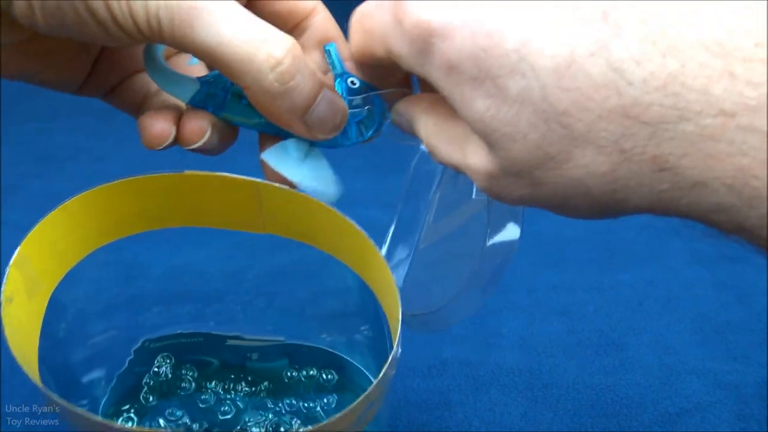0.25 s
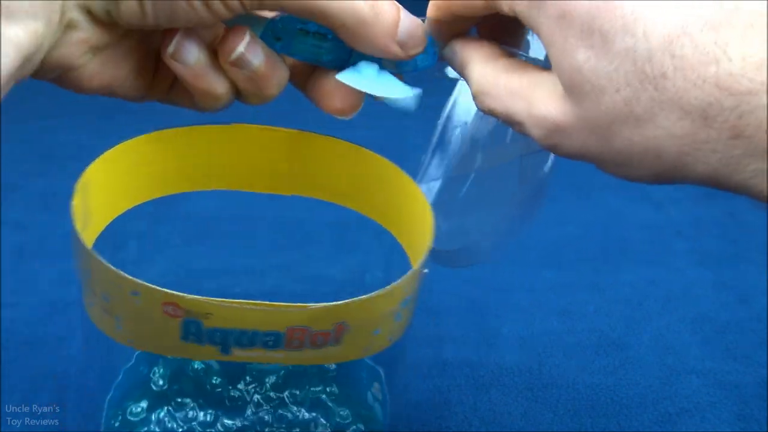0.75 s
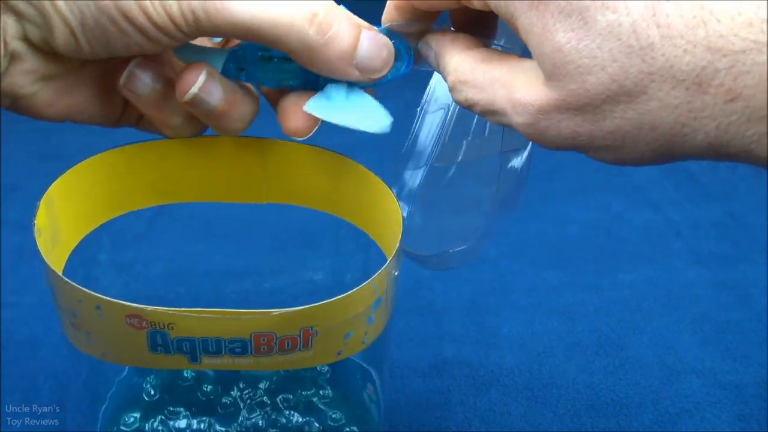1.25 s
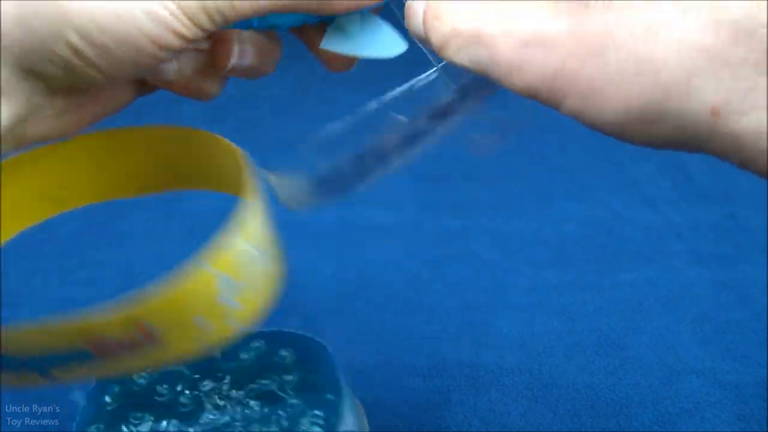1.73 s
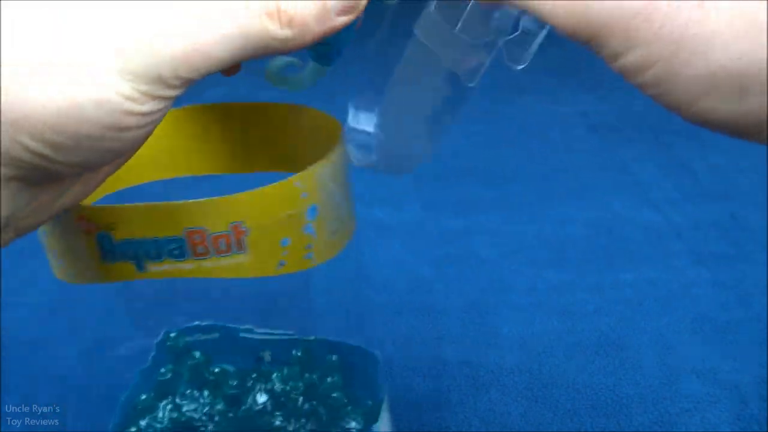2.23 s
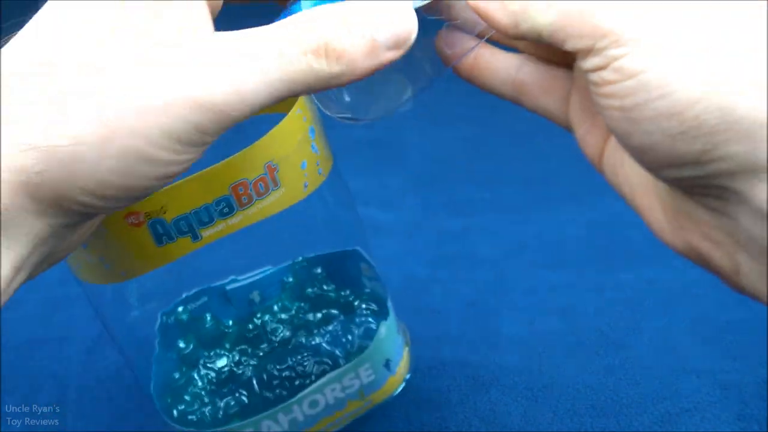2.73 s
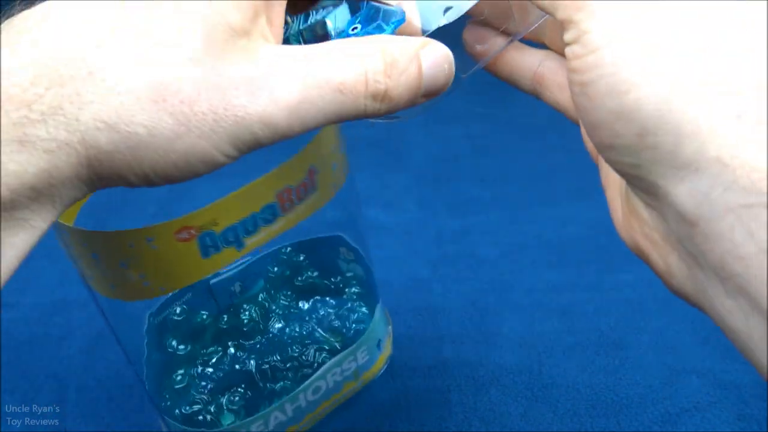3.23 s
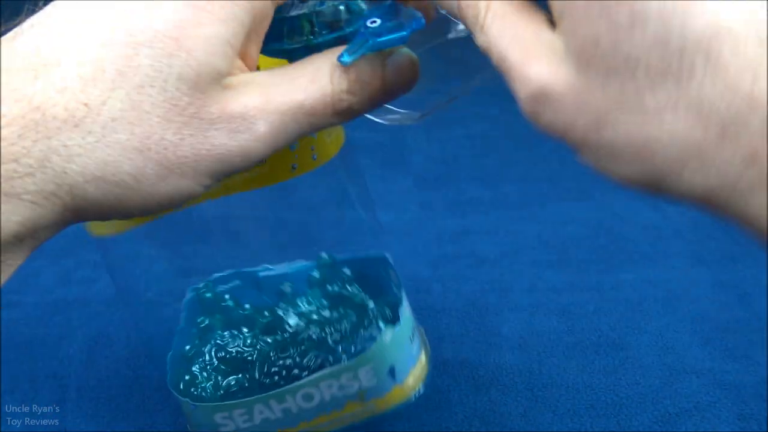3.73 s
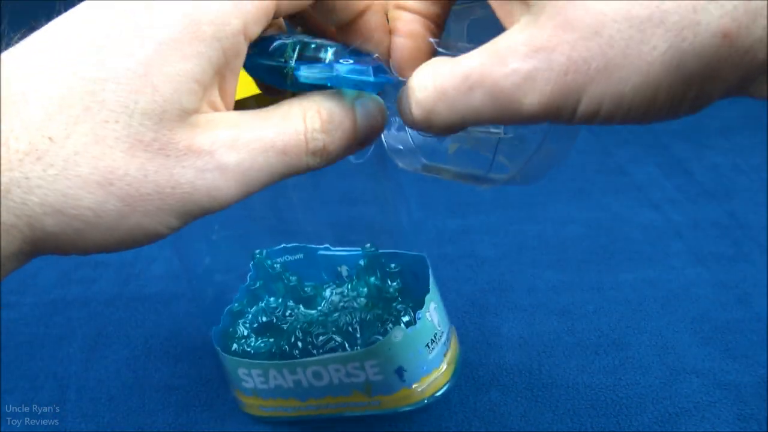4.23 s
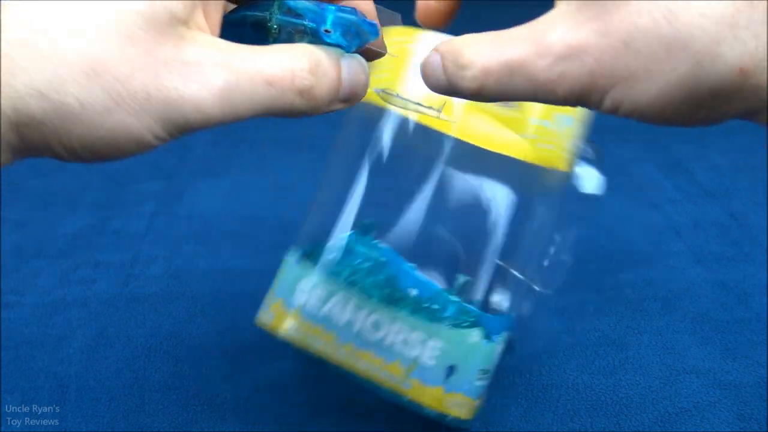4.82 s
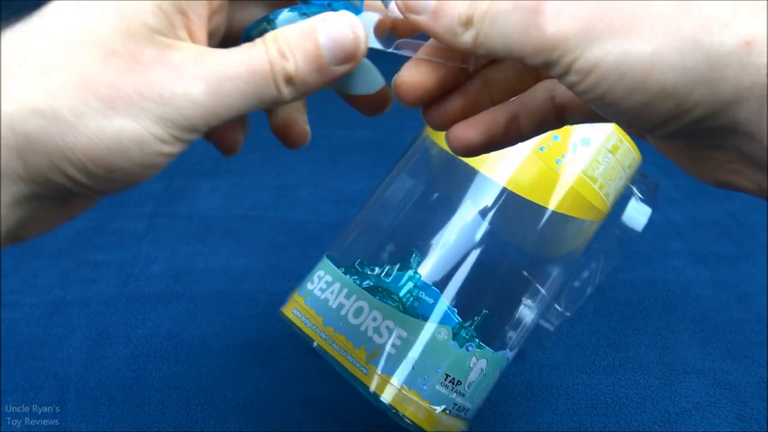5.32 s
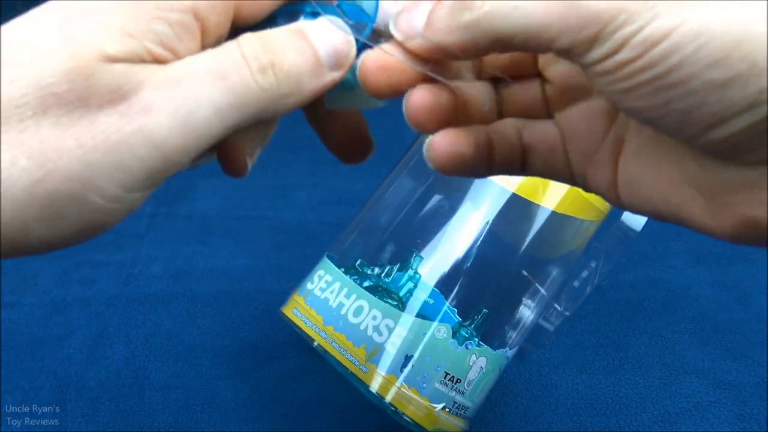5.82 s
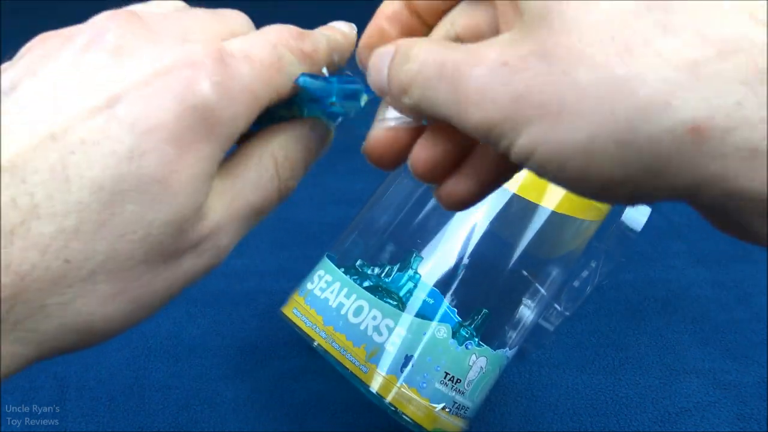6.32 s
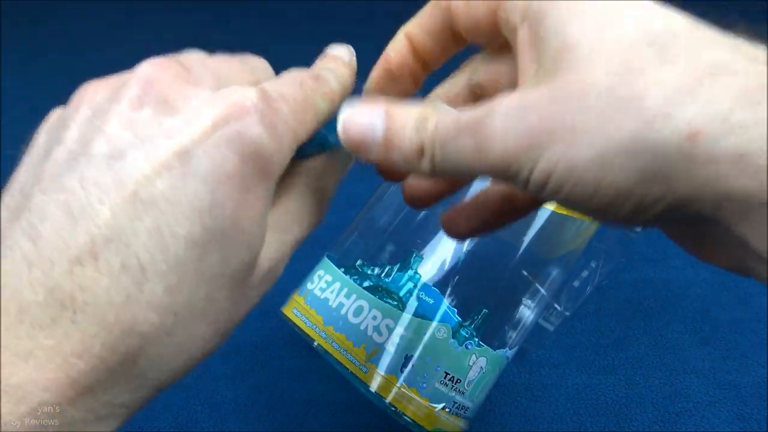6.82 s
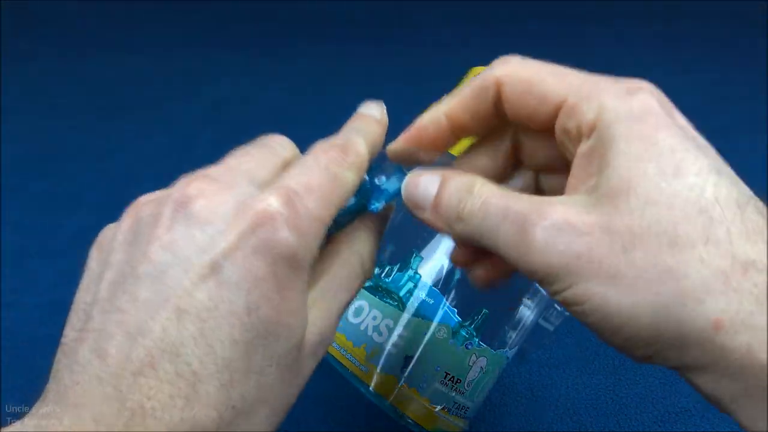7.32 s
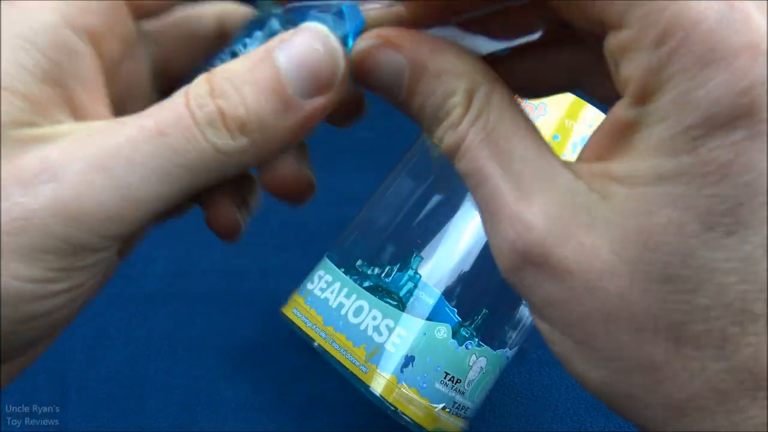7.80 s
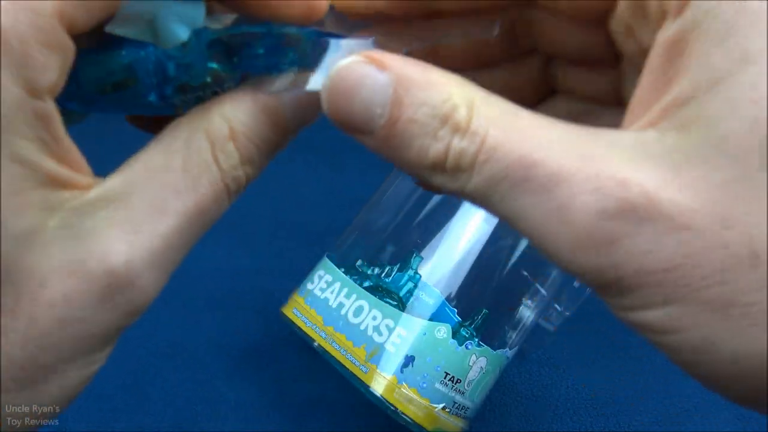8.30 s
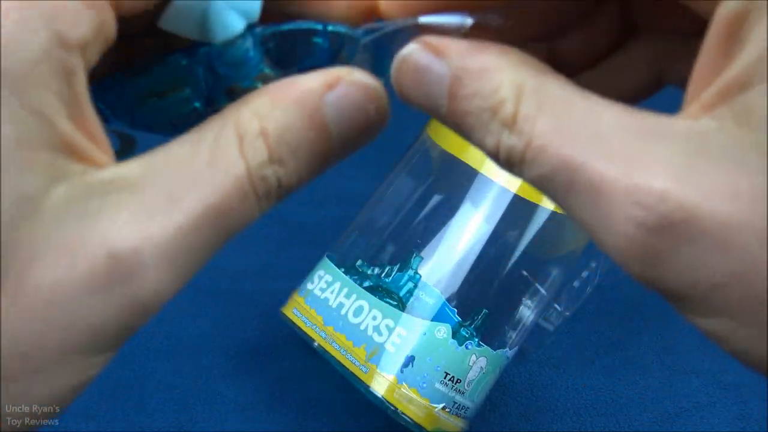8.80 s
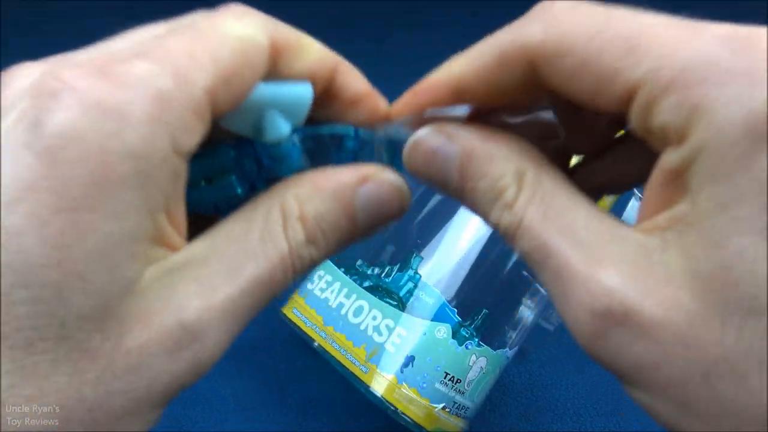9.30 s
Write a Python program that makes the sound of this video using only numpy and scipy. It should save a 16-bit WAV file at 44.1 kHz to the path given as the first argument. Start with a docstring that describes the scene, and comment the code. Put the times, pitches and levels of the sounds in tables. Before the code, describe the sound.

Close, sharp plastic snaps and rustling over a quick mechanical ticking and hollow tub bumps, a brief tear, then sparse clicks in a quiet room.

```python
"""A quiet furnished room, where hands free a small swimming toy from stiff clear packaging close by.
At first the toy's tail ticks against its stops. The sheet snaps, rustles and tears, and fingers bump the tub.
Later mostly nail taps, light strokes and scattered clicks are left over the hum of the room.
Short noise bursts ring the toy, sheet and tub; random grains make the rubbing, strokes and tear;
filtered noise makes the hum, and scattered echoes make the room."""
import sys
import numpy as np
from scipy import signal
from scipy.fft import rfft, irfft, next_fast_len
from scipy.io import wavfile
from scipy.ndimage import uniform_filter1d

SR = 44100
rng = np.random.default_rng(int(sys.argv[2]) if len(sys.argv) > 2 else 0)


def dump(signal):
    """Clip the signal to [-1, 1] and save it as 16-bit WAV at the path in sys.argv[1]."""
    limited = np.clip(np.atleast_2d(signal).T, -1, 1)
    pcm = np.round(limited * 32767).astype(np.int16)
    wavfile.write(sys.argv[1], SR, pcm)


N = 421145


def gain_of(db):
    """Turns decibels into a factor."""
    return 10 ** (np.asarray(db) / 20)


def evened(x):
    """Scales a sound to an average (rms) level of 1."""
    return x / np.sqrt(np.mean(x ** 2) + 1e-20)


def read(points, hz):
    """Reads a table of (pitch, value) between its points, on a logarithmic pitch axis."""
    f, value = np.transpose(points)
    return np.interp(np.log(hz + 1), np.log(f + 1), value)


def coloured(x, points):
    """Filters a sound by a table of (pitch_hz, level_db)."""
    size = next_fast_len(x.shape[-1])
    hz = np.fft.rfftfreq(size, 1 / SR)
    spectrum = rfft(x, size) * gain_of(read(points, hz))
    return irfft(spectrum, size)[..., :x.shape[-1]]


def peak(hz, centre_hz, width_hz):
    """Response of one resonance that rings after a blow, with gain 1 at its centre."""
    return 1j * hz * width_hz / (centre_hz ** 2 - hz ** 2 + 1j * hz * width_hz)


def placed(times, peak_db, sounds):
    """Lays short sounds on a silent track at their peak levels."""
    track = np.zeros(N + sounds.shape[1])
    for s, db, sound in zip(times, peak_db, sounds):
        track[round(s * SR):][:len(sound)] += gain_of(db) * sound / abs(sound).max()
    return track[:N]


def add(track, s, sound):
    """Adds a sound to a track from time s."""
    part = track[round(s * SR):][:len(sound)]
    part += sound[:len(part)]


def bursts(count, rise_s, t60, size=2048, lead_s=0):
    """Spectra of noise bursts, the force of a blow: a faint creak during the lead, a crack, a weaker rattle."""
    since = np.arange(size) / SR - lead_s
    t = np.maximum(since, 0)
    creak = (since < 0) * gain_of(-22 + 4000 * since)
    crack = gain_of(-60 * t / t60)
    rattle = .22 * gain_of(-22 * t / t60)
    force = creak + (1 - np.exp(-t / rise_s)) * (crack + rattle)
    return rfft(rng.standard_normal((count, size)) * force)


def grains(per_s, spread_db):
    """Random clicks of uneven size, most of them small, scaled to an average level of 1."""
    size = gain_of(spread_db * np.minimum(rng.exponential(1, N), 5)) * rng.standard_normal(N)
    return evened(size * (rng.random(N) < per_s / SR))


# tone of the room hum, before its overall level is set: pitch_hz, level_db (per Hz)
HUM_TONE = [(12, -47.5), (25, -5), (58, -9), (108, 3), (174, -10), (450, -19.5), (800, -18.5), (945, -8.5),
            (1030, -14), (1110, -9), (1300, -20), (6000, -27), (13000, -28.5), (16000, -41)]
HUM_DB = -64  # average level in the middle


def room_hum():
    """Steady noise, coloured like the hum of the room: one track for the middle, one for the side."""
    hum = coloured(rng.standard_normal((2, N)), HUM_TONE)
    return hum * gain_of(HUM_DB) / np.std(hum[0])


# how long echoes take to fade by 60 dB: pitch_hz, fade_s
ECHO_FADE = [(300, 0.33), (1300, 0.22), (3500, 0.24), (9000, 0.19), (15000, 0.078)]


def room(x):
    """Little comes back at first, the walls answer after a gap, then a tail dies band by band."""
    # six echo patterns, each with one impulse of random sign in every 20 samples
    taps = np.zeros((6, SR // 2))
    at = np.arange(120, SR // 2 - 20, 20) + rng.integers(0, 20, (6, (SR // 2 - 121) // 20))
    np.put_along_axis(taps, at, rng.choice([-1., 1.], at.shape), 1)
    hz, t, bands = signal.stft(taps, SR, nperseg=128)
    arrival = np.where(t < .011, .6, 1 + .8 * np.exp(-((t - .015) / 0.0059) ** 2))
    fade = gain_of(-60 * t / read(ECHO_FADE, hz)[:, None])
    echo = signal.istft(bands * arrival * fade, SR, nperseg=128)[1]
    # the hands move, so the echo pattern drifts among three sets of paths, 0.7 rounds per second
    rounds = .7 * np.arange(N) / SR + np.arange(3)[:, None] / 3
    turn = np.cos(2 * np.pi * rounds) * np.sqrt(2 / 3)
    wet = signal.fftconvolve(np.tile(x * turn, (2, 1)), echo / np.linalg.norm(echo[0]), axes=1)[:, :N]
    return wet.reshape(2, 3, N).sum(1)


# the hands work the packaging, levels glide between rows: time_s, sheet_hiss_db, tub_rubbing_db
HANDLING_LEVELS = [(0.0, -40.5, -54.5), (0.08, -60.5, -63), (1.44, -60, -67), (1.67, -66.5, -56),
                   (2.05, -55, -59.5), (2.31, -63.5, -56), (2.44, -50, -51), (2.6, -54.5, -62),
                   (3.0, -54, -52.5), (3.11, -56, -56), (3.33, -57.5, -68), (3.54, -52, -49.5),
                   (3.85, -58.5, -64.5), (4.57, -67.5, -68.5), (4.76, -57.5, -63), (5.16, -72.5, -64),
                   (5.64, -61, -73.5), (6.38, -76, -76), (9.55, -73.5, -77.5)]
# a bent piece of sheet relaxes in a flurry of tiny ticks: start_s, length_s, level_db
TICK_FLURRIES = [(1.946, 0.12, -54), (5.375, 0.23, -55), (5.897, 0.44, -64.5), (7.38, 0.23, -61.5),
                 (7.72, 0.38, -57.5), (8.568, 0.26, -55), (9.328, 0.2, -65)]
# ringing pitches of the hollow tub: pitch_hz, fade_s (time to fall 60 dB when struck)
TUB_MODES = [(210, 0.026), (404, 0.06), (500, 0.032), (600, 0.074), (790, 0.024), (960, 0.0067),
             (1200, 0.03), (1350, 0.07)]
CREASE_DB = -9  # tiny creases against the hiss


def handling():
    """Tiny creases tick over a hiss of sliding skin; the tub rumbles under the fingers."""
    s, *columns = np.transpose(HANDLING_LEVELS)
    sheet, tub = (gain_of(np.interp(np.arange(N) / SR, s, db)) for db in columns)
    creases = gain_of(CREASE_DB) * sheet
    for start_s, length_s, db in TICK_FLURRIES:
        add(creases, start_s, gain_of(db) * np.ones(round(length_s * SR)))
    size = next_fast_len(N)
    hz = np.fft.rfftfreq(size, 1 / SR)
    # creases of three sizes
    facets = [peak(hz, f, .7 * f) ** 2 for f in (7000, 11000, 14000)]
    tick_spectrum = sum(rfft(grains(per_s=35, spread_db=1.5), size) * facet for facet in facets)
    ticks = evened(irfft(tick_spectrum, size)[:N])
    skin = grains(per_s=5000, spread_db=4.)
    hiss = evened(coloured(skin, [(400, -28.5), (2500, 16.5), (6500, 18.5), (11000, 14.5), (16000, 13.5)]))
    # slow random swells, separate for hiss and rumble
    uneven = gain_of(3.5 * evened(uniform_filter1d(rng.standard_normal((2, N)), 1500)))
    # rubbed modes ring shorter than struck ones, and the treble is dulled
    body = sum(peak(hz, f, 3.8 / t60) for f, t60 in TUB_MODES) / (1 + (hz / 900) ** 2)
    rumble = evened(irfft(rfft(grains(per_s=970, spread_db=1.5), size) * body, size)[:N])
    return creases * ticks + sheet * hiss * uneven[0] + tub * rumble * uneven[1]


# a finger or the sheet bumps the tub: time_s, peak_db, struck_hz (pitch struck most)
TUB_BUMPS = [(.013, -33.5, 600), (0.049, -17.5, 1100), (0.224, -29, 666), (.341, -34.5, 630),
             (0.391, -30, 604), (0.631, -25, 610), (1.154, -37.5, 650), (1.534, -34, 503),
             (1.638, -31.5, 600), (1.717, -22, 1160), (2.094, -19, 910), (2.215, -26.5, 610),
             (2.242, -24.5, 442), (2.645, -24.5, 1390), (2.765, -23.5, 333), (2.892, -27, 1390),
             (2.971, -22.5, 270), (3.006, -17, 1180), (3.086, -27, 1270), (3.348, -18.5, 228),
             (3.407, -11, 430), (3.497, -30, 510), (3.648, -29.5, 387), (3.804, -33.5, 510),
             (4.819, -26.5, 626), (4.868, -32.5, 560), (4.94, -42, 450), (5.063, -38, 523),
             (5.136, -40.5, 1200), (5.23, -49, 614), (5.807, -28.5, 810)]


def bumps():
    """A soft blow rings the tub modes near the struck pitch the most, over a broad dull knock."""
    s, db, struck_hz = np.transpose(TUB_BUMPS)[:, :, None]
    hz = np.fft.rfftfreq(8192, 1 / SR)
    detune = rng.uniform(.94, 1.05, (len(s), len(TUB_MODES)))
    body = 0.025 * peak(hz, struck_hz, 1.3 * struck_hz)
    for k, (f, t60) in enumerate(TUB_MODES):
        near = gain_of(-18 * abs(np.log2(f / struck_hz)))  # 18 dB weaker per octave away
        body = body + near * t60 * peak(hz, f * detune[:, k:k + 1], np.log(1000) / np.pi / t60)
    blows = bursts(len(s), rise_s=0.0013, t60=0.023, size=8192)
    knocks = irfft(blows * body * peak(hz, struck_hz, 2 * struck_hz))
    return placed(s[:, 0], db[:, 0], knocks)


# a fingernail taps hard plastic, dry and without ring: time_s, peak_db
NAIL_TAPS = [(5.0105, -14), (5.808, -17), (6.144, -26.5), (6.305, -27), (7.904, -21), (8.489, -31.5),
             (8.881, -22)]
# colour of the nail and the wall it meets: pitch_hz, level_db (per Hz)
NAIL_COLOUR = [(59, -46), (100, -11), (2040, -3), (2470, -9.5), (4110, -3.5), (11400, -9.5), (16000, -14.5)]


def taps():
    """A very short flat blow, coloured only by the nail and the wall it meets."""
    s, db = np.transpose(NAIL_TAPS)
    hz = np.fft.rfftfreq(2048, 1 / SR)
    delay = np.exp(-2j * np.pi * hz * 64 / SR)  # 64 samples of room before the blow
    blows = irfft((1.7 + bursts(len(s), rise_s=0.00014, t60=0.0055)) * delay)
    return placed(s - 64 / SR, db, coloured(blows, NAIL_COLOUR))


# the tail ticks on a nearly steady beat; each row is a group of strokes, some following on directly,
# others after a pause: start_s, strokes (count), hard_stop_db, soft_stop_db
TAIL_STROKES = [(0.1138, 1, -10, -50), (.238, 2, -7, -28), (0.4771, 3, -6.5, -33.5),
                (0.9625, 5, -6.5, -24.5), (2.2929, 3, -7.5, -33.5)]
# ringing pitches of the toy's shell: pitch_hz, half_width_hz (doubled when played), level_db
SHELL_MODES = [(2030, 300, -15), (2730, 300, -15), (4900, 500, -10), (6500, 400, -8), (8300, 600, -5),
               (9200, 500, -2), (10700, 700, -4), (12200, 1200, 1)]
BEAT_S = .121  # one stroke out and back
UNEVEN_DB = 1.5  # strokes differ a little
BOUNCE_DB = -7.5  # the magnet rebounds and strikes again, weaker


def tail():
    """Each tick rings the toy's shell; magnet and stop meet almost the same way each time."""
    ticks = []
    for start_s, strokes, hard_db, soft_db in TAIL_STROKES:
        for k in range(2 * round(strokes)):
            ticks.append((start_s + k * BEAT_S / 2, soft_db if k % 2 else hard_db))
    s, db = np.transpose(ticks)
    db = db + UNEVEN_DB * rng.standard_normal(len(s))
    hz = np.fft.rfftfreq(2048, 1 / SR)
    shell = sum(gain_of(level) * peak(hz, f, 2.0 * w) for f, w, level in SHELL_MODES)
    # a constant sharp click plus a burst that varies
    blow = gain_of(6) + bursts(len(s), rise_s=.0003, t60=.007)
    bounce_s = rng.uniform(.0021, .0045, (len(s), 1))
    blow = blow * (1 + gain_of(BOUNCE_DB) * np.exp(-2j * np.pi * hz * bounce_s))
    return placed(s, db, irfft(blow * shell))


# plastic slides over plastic or skin in one short stroke: middle_s, level_db, length_s, centre_hz
SCRAPE_STROKES = [(0.004, -41, 0.1, 6640), (0.64, -34, 0.0062, 8750), (0.646, -41.5, 0.041, 620),
                  (.835, -43, 0.026, 4900), (1.722, -43.5, 0.13, 4900), (1.749, -44.5, 0.15, 410),
                  (2.156, -30.5, 0.027, 6540), (2.226, -37.5, 0.057, 1800), (2.241, -28, 0.012, 8050),
                  (2.644, -28.5, 0.015, 5670), (2.77, -36, 0.036, 4560), (2.894, -29, 0.029, 6630),
                  (3.01, -29, 0.038, 6340), (3.018, -35.5, 0.058, 1120), (3.503, -32.5, 0.021, 5000),
                  (4.099, -51.5, 0.14, 500), (4.863, -48, 0.1, 4970), (5.32, -52.5, 0.029, 5800),
                  (5.567, -51, 0.076, 6400), (6.161, -44, 0.031, 6900), (7.054, -53.5, 0.056, 5490),
                  (7.417, -45.5, 0.029, 7860), (7.561, -40.5, 0.032, 7060), (7.905, -25, 0.007, 5800),
                  (8.597, -40, 0.023, 7560), (6.813, -38, 0.015, 4900), (8.172, -57, 0.043, 5400)]


def scrapes():
    """Strokes of dense tiny slips that swell and fade, each in its own broad band."""
    slips = grains(per_s=4000, spread_db=2.8)
    t = np.arange(N) / SR
    hz = np.fft.rfftfreq(8192, 1 / SR)
    out = np.zeros(N)
    for s, db, length_s, centre_hz in SCRAPE_STROKES:
        at = max(round(s * SR) - 4096, 0)
        band = peak(hz, centre_hz, .8 * centre_hz)
        stroke = evened(irfft(rfft(slips[at:at + 8192], 8192) * band))
        swell = np.exp(-(2 * (t[at:at + 8192] - s) / length_s) ** 4)
        out[at:at + 8192] += gain_of(db) * swell * stroke[:len(swell)]
    return out


# colour of the tearing sheet: pitch_hz, level_db (per Hz)
TEAR_COLOUR = [(88, -41), (150, -8), (336, -3), (682, -6), (1750, -0.5), (2130, -5.5), (10100, -1),
               (15600, -13.5), (16500, -36)]
# the stiff rim of the tub sings with the tear: pitch_hz
RIM_PITCHES = [2800, 3840]
TEAR_S, TEAR_RISE_S, TEAR_HOLD_S = 4.574, 0.018, 0.043  # the hold includes the rise
TEAR_DB, TEAR_FADE_DB_PER_S = -20, 226  # level before the rim is added


def tear():
    """The sheet tears free of the tub: dense slips swell quickly, hold and fade, and make the rim sing."""
    since = np.arange(N) / SR - TEAR_S
    rise = np.clip(since / TEAR_RISE_S, 0, 1)
    fade = gain_of(TEAR_DB - TEAR_FADE_DB_PER_S * np.maximum(since - TEAR_HOLD_S, 0))
    out = rise * fade * evened(coloured(grains(per_s=5600, spread_db=1.0), TEAR_COLOUR))
    for f in RIM_PITCHES:
        rim = signal.lfilter(*signal.iirpeak(f, 70, SR), out)
        out = out + gain_of(8.5) * rim
    return out


SMALL_PER_S = 26  # small snaps of chance
SMALL_DB = 28.5  # the strongest small snap's peak above the hiss


def small_snaps():
    """Lesser creases flip at random moments, as strongly as the hands are working."""
    when, size, facet = rng.random((round(SMALL_PER_S * N / SR), 3)).T
    s, sheet_db, _ = np.transpose(HANDLING_LEVELS)
    when = .01 + when * (N / SR - .02)
    db = np.interp(when, s, sheet_db) + SMALL_DB - 16 * size
    ring_hz = 2000 * 5 ** facet
    return np.transpose([when, db, ring_hz])


# a crease in the sheet flips over: time_s, peak_db, ring_hz (ring of the facet)
CREASE_SNAPS = [(0.0518, -7.5, 5740), (0.125, -14.5, 6870), (.207, -29.5, 5500), (0.2514, -13, 7200),
                (0.279, -24, 7300), (.298, -23, 7000), (0.3095, -19, 6160), (0.317, -13, 7040),
                (0.4, -18, 6900), (.418, -21.5, 6660), (.552, -25, 8700), (.6655, -17, 8100),
                (.9086, -14, 8950), (1.002, -17, 9200), (1.022, -20.5, 9200), (1.5343, -22, 2170),
                (1.6796, -25.5, 6870), (1.7186, -16.5, 7450), (1.8044, -28.5, 4690), (1.8213, -28, 8850),
                (1.9095, -5, 6000), (1.9207, -12.5, 6600), (1.949, -19, 6930), (2.0418, -25, 5400),
                (2.0822, -18, 5560), (2.0886, -9, 5400), (2.0985, -9, 5300), (2.1962, -6.5, 5100),
                (2.2846, -17, 5570), (2.37, -8, 7550), (2.4718, -23, 6850), (2.4993, -20, 2480),
                (2.6442, -12.5, 6240), (2.6634, -21, 6730), (2.7278, -34, 3820), (2.761, -5.5, 5660),
                (2.7711, -7.5, 8550), (2.796, -11.5, 1840), (2.8437, -21.5, 5800), (2.8829, -19.5, 5730),
                (2.8976, -12, 2090), (3.0034, -20, 1920), (3.028, -12, 3850), (3.0898, -8.5, 7400),
                (3.1115, -12, 6900), (3.1453, -25, 2540), (3.3496, -3.5, 2000), (3.503, -13, 7610),
                (3.5882, -13.5, 4500), (3.6496, -10.5, 2080), (3.717, -21, 3700), (3.8128, -9, 5960),
                (4.0713, -3, 9000), (4.2881, -21.5, 6400), (4.5488, -7.5, 4200), (4.559, -11.5, 3710),
                (4.573, -9, 4100), (4.6615, -12, 6000), (4.8283, -18, 5400), (4.8698, -21, 9800),
                (5.47, -13.5, 8600), (5.5518, -13.5, 6050), (5.5766, -21, 6560), (5.899, -30, 2590),
                (6.0246, -27.5, 6160), (6.0439, -27.5, 6400), (6.1533, -20, 7000), (6.3604, -30, 6670),
                (6.769, -25, 7370), (6.8116, -5.5, 6860), (7.27, -37.5, 7100), (7.4066, -25.5, 10500),
                (7.4673, -27.5, 11700), (7.5346, -26, 10700), (7.8416, -23.5, 7760), (7.8692, -8, 10600),
                (8.1689, -26, 4930), (8.6056, -20, 9350), (9.35, -32, 5060)]
# broad colour of the whole sheet: pitch_hz, level_db
SHEET_COLOUR = [(300, -28.5), (1000, -22), (3000, -11.5), (6000, -4.5), (10000, -12.5), (14000, -19.5),
                (17000, -3)]


def snaps():
    """A sharp crack coloured by the sheet and by the ring of one facet; large, low facets sound fuller."""
    s, db, ring_hz = np.vstack([CREASE_SNAPS, small_snaps()]).T[:, :, None]
    hz = np.fft.rfftfreq(2048, 1 / SR)
    facet = peak(hz, ring_hz, .4 * ring_hz) + gain_of(read(SHEET_COLOUR, hz))
    fullness = gain_of(-18.0 - 2 * np.log2(ring_hz / 6000))
    colour = facet + fullness * peak(hz, 2030, 800)
    cracks = irfft(bursts(len(s), rise_s=.0003, t60=.006, lead_s=.006) * colour)
    return placed(s[:, 0] - .006, db[:, 0], cracks)  # start early by the lead


# treble trim of ticks, cracks, bumps and strokes: pitch_hz, level_db
TREBLE_TRIM = [(12000, -1), (14500, -10), (16500, -12.5)]
# how strong the side is against the middle: pitch_hz, level_db
SIDE_COLOUR = [(40, -24.5), (120, -20.5), (400, -7.5), (1200, -19.5), (2800, -33.5), (6000, -11),
               (15000, -14.5)]


def scene():
    """Adds up all sounds as middle and side, then makes left and right of two close microphone ports."""
    trimmed = coloured(tail() + snaps() + bumps() + scrapes() + tear(), TREBLE_TRIM)
    near = trimmed + taps() + handling()
    wet = room(near)
    hum = room_hum()
    mid = near + gain_of(-11.5) * wet[0] + hum[0]
    # the housing scatters sound unequally to the ports
    housing = rng.standard_normal(225) / 15
    scattered = signal.oaconvolve(near, housing)[:N]
    side = gain_of(-5) * scattered + gain_of(-21.5) * wet[1] + gain_of(4.5) * hum[1]
    side = coloured(side, SIDE_COLOUR)
    return np.array([mid + side, mid - side])


EDGE_HZ = 16200  # highest pitch let through


def record(dry):
    """Rounds off the sharpest cracks smoothly, then removes the treble above the edge."""
    ceiling = .45
    limited = ceiling * np.tanh(dry / ceiling)
    lowpass = signal.firwin(255, EDGE_HZ, window=("kaiser", 9), fs=SR)
    return signal.oaconvolve(limited, lowpass[None], "same")


dry = scene()
out = record(dry)
dump(out)
```